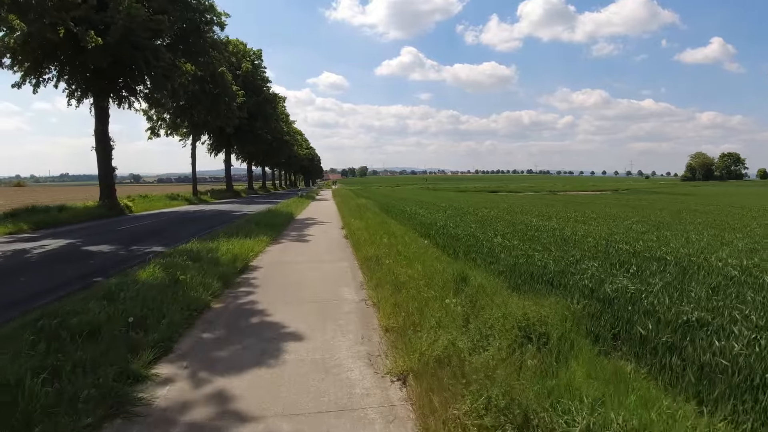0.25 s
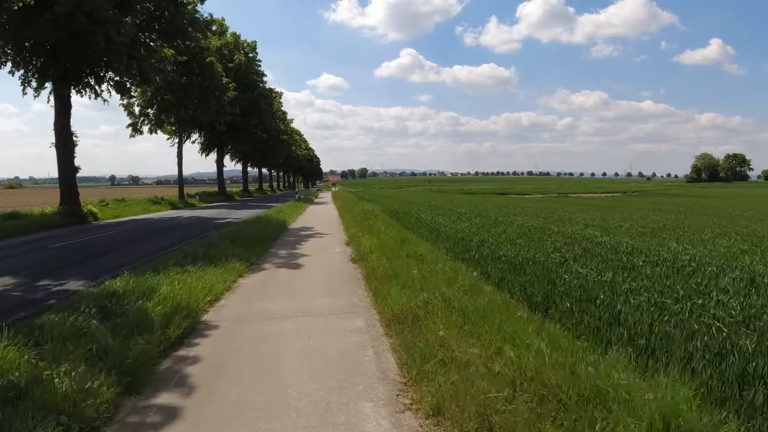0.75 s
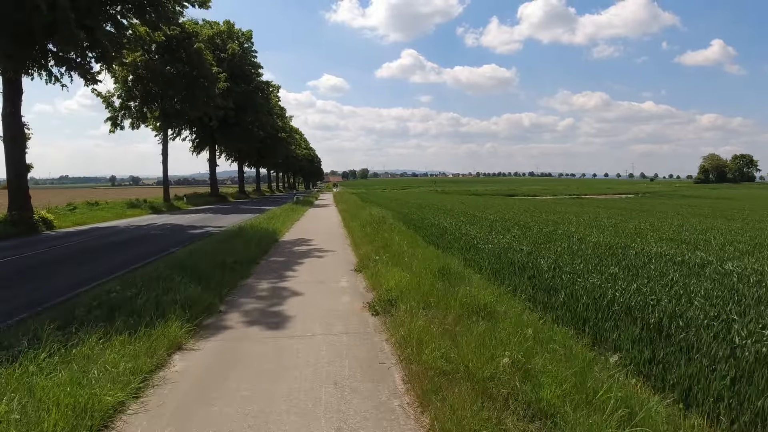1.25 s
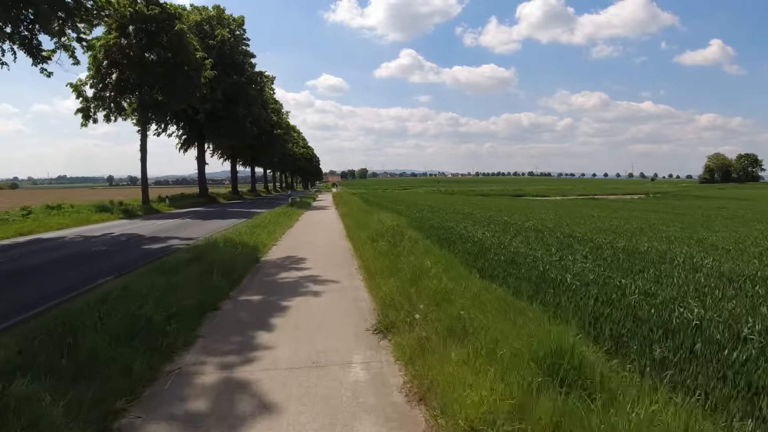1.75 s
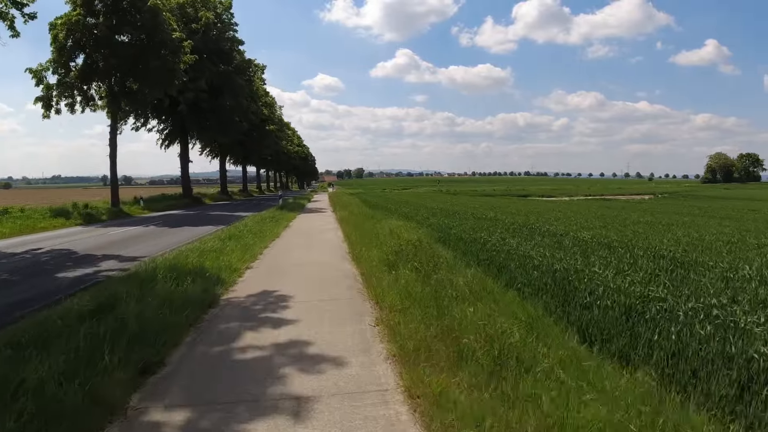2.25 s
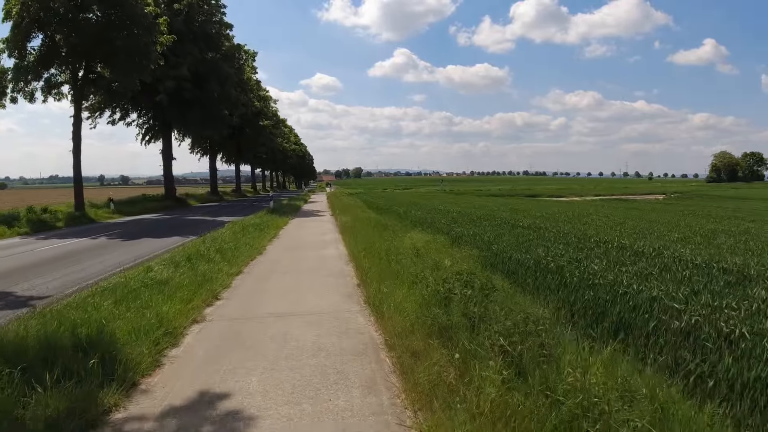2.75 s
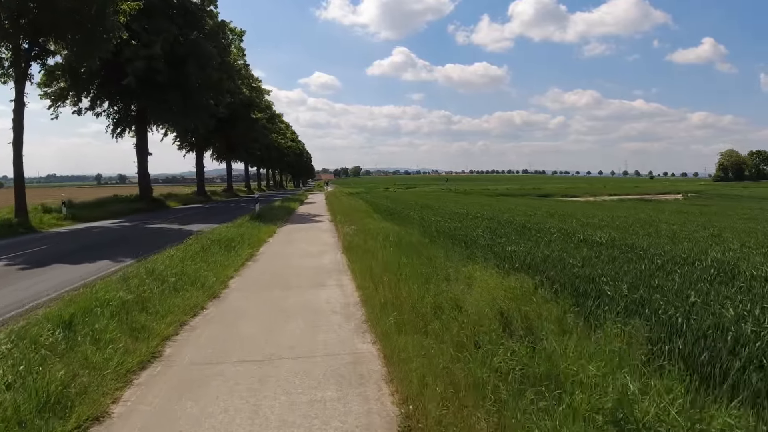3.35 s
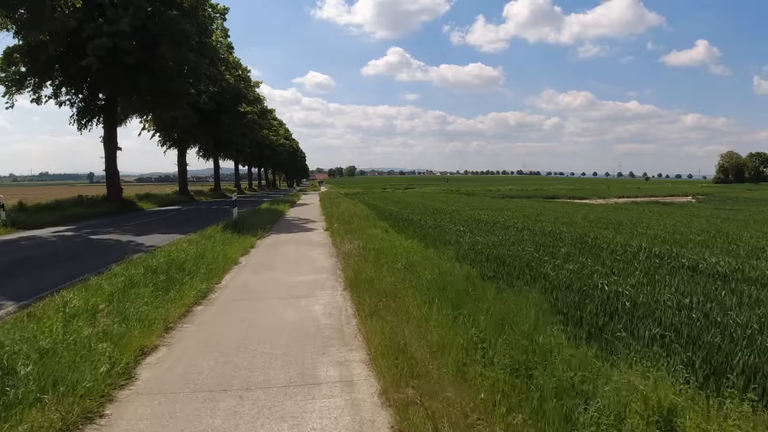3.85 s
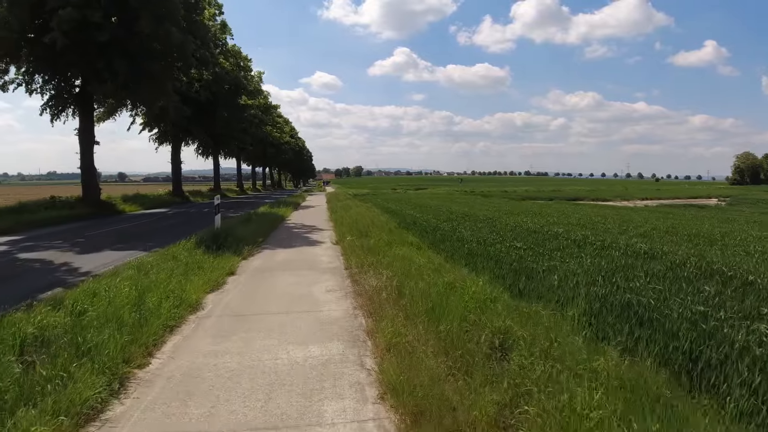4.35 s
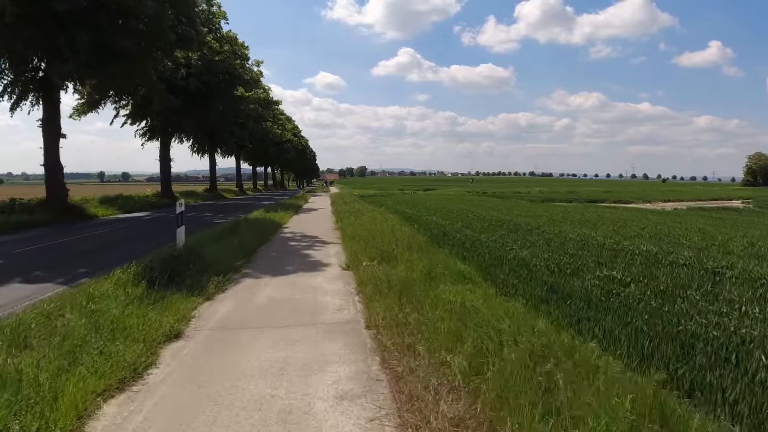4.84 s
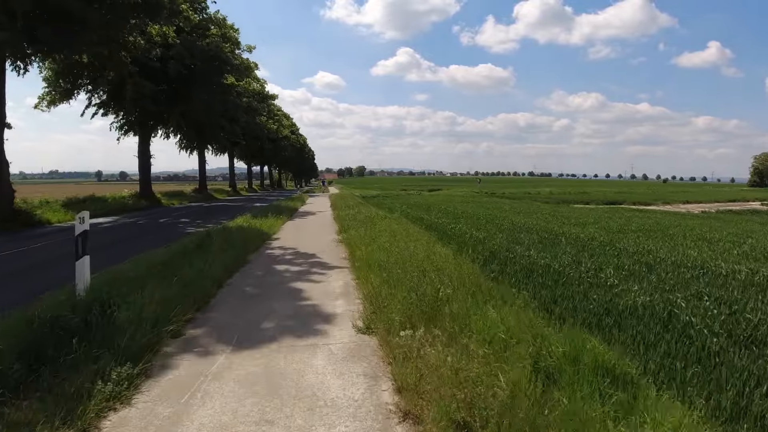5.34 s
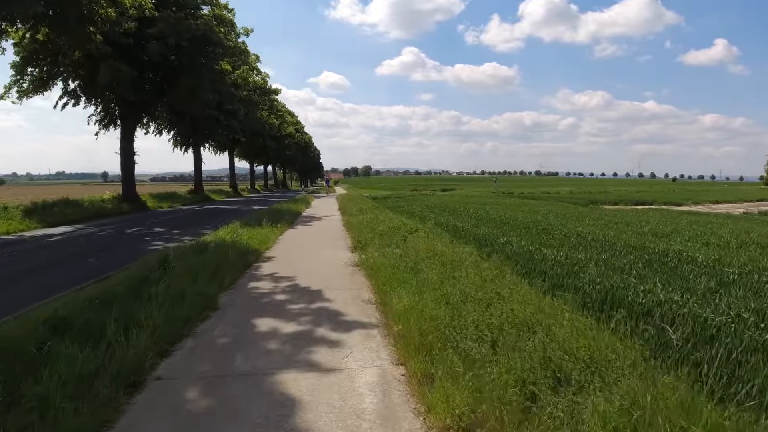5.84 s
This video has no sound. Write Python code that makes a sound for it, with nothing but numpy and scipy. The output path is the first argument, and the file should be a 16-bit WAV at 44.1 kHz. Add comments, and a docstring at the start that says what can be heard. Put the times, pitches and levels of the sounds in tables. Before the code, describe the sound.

An electric kick scooter rolls at constant speed along a concrete path beside open fields, heard from a microphone on board. Throughout, a low hub motor whine near 390 Hz beats and flutters over droning tyres, grainy grit, pebble ticks, a faint rough whirr and thin high hiss. Head wind rumbles low; a hard thump hits at about 0.8 s, then gusts crowd together from 1.0 to 2.5 s, swinging between left and right. Two hollow deck knocks sound at 2.3 and 2.5 s. The wind drops to a lull near 2.9 s, leaving motor and tyres clearer, with a brief gust around 3.3 s. Small loose-part clacks are scattered all along. Rolling turns coarser after 3.4 s; a bump booms at 4.8 s with rattling, and sharper clacks cluster from 5.1 to 5.9 s. Softer gusts arrive at 5.3 and 5.8 s, with a deep thump at 6.0 s as the ride continues.

```python
"""A whining hub motor with a flutter, over droning tyres: an electric kick scooter on a concrete path.
The whine is beating tones that follow the wheel speed; the rest of the ride is noise and clicks that
ring the frame: drone, grit, pebbles, and clacks of loose parts. Two hollow knocks ring on one note.
Gusts of head wind buffet two microphone ports: coloured noise that swells, with thumps that swing
through a few cycles. A faint high hiss lies on top."""
import sys
import numpy as np
from scipy import signal
from scipy.fft import rfft, irfft, next_fast_len
from scipy.io import wavfile

SR = 44100
rng = np.random.default_rng(int(sys.argv[2]) if len(sys.argv) > 2 else 0)


def output_pcm(signal):
    """Save a mono or channel-first signal as 16-bit PCM at the path in sys.argv[1].

    Samples are clipped to [-1, 1] before scaling.
    """
    pcm = np.clip(np.atleast_2d(signal).T, -1, 1) * 32767
    wavfile.write(sys.argv[1], SR, np.round(pcm).astype(np.int16))


N = 268613
TIME = np.arange(N) / SR
FFT_SIZE = next_fast_len(N + 8192)   # spare room lets filters ring out past the end
HZ = np.maximum(np.arange(FFT_SIZE // 2 + 1) * SR / FFT_SIZE, 1)


def from_db(db):
    """Turn decibels into a plain factor."""
    return 10 ** (np.asarray(db) / 20)


def rms_one(x):
    """Scale a signal to an average strength (RMS) of 1."""
    return x / np.sqrt(np.mean(x ** 2) + 1e-20)


def in_time(rows):
    """Read each column of a time table at every sample, with straight lines between rows."""
    s, *columns = np.transpose(rows)
    return [np.interp(TIME, s, c) for c in columns]


def at_hz(points):
    """Read a frequency table at every frequency, on a log axis."""
    knots, values = np.transpose(points)
    return np.interp(np.log(HZ), np.log(knots), values)


def by_frequency(x, response):
    """Filter x with a frequency response, scaled so that white noise keeps its power."""
    response = response / np.sqrt(np.mean(np.abs(response) ** 2))
    return irfft(rfft(x, FFT_SIZE) * response, FFT_SIZE)[..., :N]


def coloured(x, points):
    """Give white noise a colour."""
    return by_frequency(x, from_db(at_hz(points)))


def drift(rate_hz):
    """Slow chance with a spread of 1: smoothed noise, made at every 40th sample."""
    step, warm_up = 40, 2000
    r = np.exp(-2 * np.pi * rate_hz * step / SR)
    noise = rng.standard_normal(N // step + warm_up + 2)
    slow = signal.lfilter([1], [1, -2 * r, r * r], noise)[warm_up:]
    return np.interp(np.arange(N) / step, np.arange(len(slow)), rms_one(slow))


def kicks(starts, peaks_db):
    """A single click at each start."""
    out = np.zeros(N)
    out[np.round(starts * SR).astype(int)] = from_db(peaks_db)
    return out


def burst(starts, peaks_db, rise_s, decay_s):
    """An envelope that swells quickly at each start and dies away."""
    age = TIME[:SR // 5]
    shape = (1 - np.exp(-age / rise_s)) * np.exp(-age / decay_s)
    return signal.oaconvolve(kicks(starts, peaks_db), shape)[:N]


def resonances(modes):
    """Frequency response of modes driven side by side, each a peak with its own width."""
    return sum(from_db(db) / (1 + 1j * (HZ - hz * hz / HZ) / width) for hz, width, db in modes)


def shaken(body, envelope, colour, apart_db):
    """Dense tiny contacts (noise) drive the body; each port hears a small part of its own."""
    force = rng.standard_normal(N) + from_db(apart_db) * rng.standard_normal((2, N))
    return by_frequency(force * envelope, body * from_db(at_hz(colour)))


# wheel speed: time_s, speed (share of cruising speed)
WHEEL_SPEED = [(0, 1.0), (.2, 1.006), (.45, .998), (1.0, 1.003), (1.25, .989), (1.6, .999), (1.85, .99),
               (2.3, .987), (2.8, 1.0), (3.3, 1.007), (3.8, 1.006), (4.1, .996), (4.55, 1.009),
               (5.2, 1.012), (5.45, 1.002), (5.65, 1.013), (5.85, .995), (6.09, 1.01)]
# motor whine, before the trim and swell: time_s, level_db
WHINE_LEVEL = [(0, -46), (.55, -47.5), (1.0, -48.5), (1.45, -45), (2.2, -51.5), (2.5, -44), (3.6, -43.5),
               (4.2, -44.5), (4.5, -46.5), (5.05, -43), (5.23, -45.5), (5.32, -52), (5.42, -42), (5.8, -50),
               (5.96, -39), (6.09, -46.5)]
# tones at cruising speed: pitch_hz, relative_level_db, flutter (share of the tone), flutter_rate_hz
MOTOR_TONES = [(194.8, -16, 1, 13), (388.8, 4, 0.15, 17), (580.6, -8, 0.26, 4.8), (780, -22.5, 0.34, 5.7)]
BEAT_HZ = 4.79


def motor(wobble=0.0042, level_db=-2.0, beat_share=0.3, swell_db=1.2):
    """Tones follow the wheel, each beating with a weaker one below; the path shakes strength and phase."""
    speed, = in_time(WHEEL_SPEED)
    db, = in_time(WHINE_LEVEL)
    travel = np.cumsum(speed * (1 + wobble * drift(12))) / SR   # seconds' worth of cruising
    beat = 1 + beat_share * np.exp(-2j * np.pi * BEAT_HZ * TIME)
    out = 0
    for hz, tone_db, flutter, flutter_hz in MOTOR_TONES:
        shake = beat + flutter * (drift(flutter_hz) + 1j * drift(flutter_hz))
        out = out + from_db(tone_db) * np.real(shake * np.exp(2j * np.pi * hz * travel))
    return from_db(db + level_db + swell_db * drift(23)) * rms_one(out)


# wavering whirr of the running gear: centre_pitch_hz, level_db
WHIRR_TONES = [(1135, -59), (1660, -64.5)]


def whirr(waver=0.03, waver_hz=22, throb_db=4):
    """Rough tones whose pitch and strength wander many times a second."""
    out = 0
    for hz, db in WHIRR_TONES:
        phase = 2 * np.pi * np.cumsum(hz * (1 + waver * drift(waver_hz))) / SR
        throbbing = from_db(throb_db * drift(30)) * np.sin(phase)
        out = out + from_db(db) * rms_one(throbbing)
    return out


# tyre forces on concrete that grows coarser along the way: time_s, drone_db, grit_db (before trims)
ROLLING_LEVELS = [(0, -51.5, -53.5), (1.6, -50, -53), (2.9, -51, -53.5), (3.4, -47, -52), (4.5, -50, -51),
                  (5.4, -47, -50), (6.09, -51, -51)]
# bumps in the path that make the tyres boom: start_s, drive_db
TYRE_BUMPS = [(0.447, -47), (3.72, -47), (4.811, -36)]
# colour of the low tyre force: frequency_hz, level_db (per Hz)
DRONE_COLOUR = [(200, -4.5), (320, -8), (390, -3.5), (650, -5), (850, -28.5), (1400, -50)]
# colour of the force from the coarse grain: frequency_hz, level_db (per Hz)
GRIT_COLOUR = [(400, -11), (760, 2), (1200, 4), (2000, 1), (3500, -4), (3800, -5.5), (4250, -7.5),
               (5200, -17.5), (5700, -35), (8000, -47)]


def tyres(body, drone_db=-0.5, grit_db=0.2, lumpy_db=2.0, grain_db=1.05, rise_s=0.0099, decay_s=0.019):
    """The tyres drone on the concrete and boom at bumps; its coarse grain makes the frame chatter."""
    drone, grit = in_time(ROLLING_LEVELS)
    s, db = np.transpose(TYRE_BUMPS)
    drone_force = from_db(drone + drone_db + lumpy_db * drift(4.4))
    low_force = drone_force + burst(s, db, rise_s, decay_s)
    grit_force = from_db(grit + grit_db + grain_db * drift(110))
    low = shaken(body, low_force, DRONE_COLOUR, apart_db=-10.0)
    high = shaken(body, grit_force, GRIT_COLOUR, apart_db=-12.0)
    return low + high


def pebbles(body, per_s=60, level_db=13.0, spread_db=3.0):
    """Small stones tick under the tyres at random, a few of them harder."""
    _, grit = in_time(ROLLING_LEVELS)
    sizes = from_db(spread_db * np.minimum(rng.exponential(1, N), 2)) * rng.choice([-1, 1], N)
    hits = rng.random(N) < per_s / SR
    force = hits * sizes * from_db(grit + level_db)
    return by_frequency(force, body * from_db(at_hz(GRIT_COLOUR)))


# head wind that rises and falls, with its deepest lull near 2.9 s: time_s, level_db (before scaling)
WIND_LEVEL = [(0, -45), (0.27, -49), (0.58, -46), (0.88, -41), (1.25, -49), (1.58, -46), (2.0, -41.5),
              (2.47, -35), (2.68, -54.5), (2.9, -61), (3.1, -41), (3.2, -54.5), (3.42, -44.5),
              (3.63, -56.5), (3.87, -47.5), (5.6, -47), (6.09, -43.5)]
# gusts, each with a thump on the ports: start_s, swell_db, swell_width_s, thump_db, thump_pitch_hz
WIND_GUSTS = [(0.485, -43, 0.05, -33, 69.4), (0.71, -42.5, 0.029, -29.5, 151),
              (0.784, -36, 0.026, -12.5, 95), (0.857, -46, 0.017, -25, 97), (1.064, -38, 0.018, -21, 142),
              (1.315, -43, 0.022, -23.5, 138), (1.446, -40.5, 0.053, -18, 165),
              (1.477, -37.5, 0.021, -18.5, 151), (1.503, -48, .012, -20.5, 70),
              (1.701, -37.5, 0.014, -27, 106), (1.73, -44, .02, -25, 223), (1.836, -39.5, 0.019, -30, 75),
              (1.928, -41, 0.021, -22.5, 128), (2.016, -44, 0.016, -24.5, 152),
              (2.051, -40, 0.028, -31, 120), (2.118, -47, 0.018, -23.5, 113),
              (2.206, -36.5, 0.018, -20, 119), (2.277, -37, 0.027, -33, 104),
              (2.335, -39, 0.016, -18.5, 111), (2.37, -35.5, 0.022, -13, 124), (2.401, -41, .015, -26, 86),
              (2.456, -38, 0.054, -23, 120), (3.325, -38, 0.055, -24.5, 115),
              (4.518, -45.5, 0.054, -40, 60), (5.256, -43, 0.025, -26, 55.6),
              (5.772, -36, 0.072, -23.5, 88), (5.997, -39, 0.027, -16, 45.3)]
CREST_LAG_S = 0.014   # a gust is strongest this long after its thump starts
STRONG_WIND_DB = -33.5   # level of a full gust


def wind_strength():
    """Gusts swell and fade as bell curves on top of the varying wind; dB relative to a full gust."""
    wind_db, = in_time(WIND_LEVEL)
    power = from_db(wind_db) ** 2
    for s, swell_db, width_s, *_ in WIND_GUSTS:
        bell = np.exp(-((TIME - s - CREST_LAG_S) / width_s) ** 2)
        power = power + from_db(swell_db) ** 2 * bell
    return 10 * np.log10(power) - STRONG_WIND_DB


# colour of the low wind rumble: frequency_hz, level_db (per Hz)
BUFFET_COLOUR = [(8, -17.5), (25, 3.5), (65, 5), (145, -1.5), (195, -5), (240, -15), (330, -27),
                 (600, -37.5), (2000, -85)]
# colour of the higher flapping in strong gusts: frequency_hz, level_db (per Hz)
GUST_COLOUR = [(60, -19), (130, 7), (220, -3.5), (350, -8.5), (600, -23.5), (1500, -52), (4000, -82.5)]


def wind(rumble_db=-29.5, rumble_growth=0.98, lumpy_db=1.5, gust_db=-34, gust_growth=1.97):
    """Each port has eddies of its own; strong gusts add smaller, higher ones."""
    db = wind_strength()
    eddies = from_db(lumpy_db * np.array([drift(38), drift(17)]))
    rumble = from_db(rumble_db + rumble_growth * db) * coloured(rng.standard_normal((2, N)), BUFFET_COLOUR)
    flap = from_db(gust_db + gust_growth * db) * coloured(rng.standard_normal((2, N)), GUST_COLOUR)
    return eddies * (rumble + flap)


# colour of the high hiss: frequency_hz, level_db (per Hz)
HISS_COLOUR = [(2000, -13.5), (5500, 5.5), (7500, -4), (9500, 2.5), (11500, 1.5), (12600, 3), (14500, -1.5)]


def hiss(level_db=-30, flicker_db=1.0):
    """A faint high hiss, noise whose level follows the grit under the tyres."""
    _, grit = in_time(ROLLING_LEVELS)
    strength = from_db(grit + level_db + flicker_db * drift(30))   # level_db is relative to the grit
    return strength * coloured(rng.standard_normal((2, N)), HISS_COLOUR)


# clacks of loose parts: start_s, drive_db, dull_part_db (relative to drive_db),
# focus_hz (the fitting rings most around it)
LOOSE_CLACKS = [(0.059, -46, 15, 2600), (0.635, -47, 13, 2080), (0.728, -50, 16.5, 1900),
                (1.06, -52, 4, 2980), (1.2705, -48, -4, 2700), (1.531, -43, 7, 3000),
                (1.5465, -43.5, 10.5, 3500), (1.712, -44, -3, 2300), (1.736, -44.5, -10, 3430),
                (2.273, -42, -6, 3100), (2.95, -42.5, -0.5, 2650), (3.3305, -46, 8, 1890),
                (3.346, -42, 9.5, 1900), (3.9805, -40, -0.5, 2100), (4.278, -42, -1, 2900),
                (4.4325, -43, 9.5, 3520), (4.684, -46, 3, 3380), (4.802, -38, 4, 2540),
                (4.8079, -41.5, 8.5, 3100), (4.818, -51, 10.5, 2480), (4.849, -44, 3, 2660),
                (5.076, -44.5, 2, 3400), (5.093, -38, 8.5, 2050), (5.119, -36, 8, 2030),
                (5.1605, -44, 12, 1720), (5.297, -40, 10, 2080), (5.306, -43.5, 13.5, 1700),
                (5.481, -42, 9, 2920), (5.4894, -53.5, 19, 1750), (5.699, -39, 2, 1680),
                (5.717, -49.5, 4, 2930), (5.853, -42.5, 16.5, 3450), (5.865, -44, 10.5, 2520),
                (5.9073, -39, 13, 2500)]
# a loose metal fitting that rings along with each clack: pitch_hz, relative_level_db
FITTING_MODES = [(1730, 2), (2040, 1), (2480, -2), (2600, -2), (2920, -2), (3468, -1)]
FITTING_WIDTH_HZ = 50
# colour of the bright part of a clack: frequency_hz, level_db (per Hz)
BRIGHT_COLOUR = [(700, -24.5), (1500, -5), (2200, 4), (3500, 3.5), (3800, -5.5), (4300, -1.5), (5500, -23),
                 (8000, -39), (14000, -31.5)]
# colour of the dull part of a clack: frequency_hz, level_db (per Hz)
DULL_COLOUR = [(300, -11.5), (550, -6.5), (900, 2.5), (1800, -4.5), (2600, -16), (5000, -43)]


def clacks(body, rise_s=0.0051, decay_s=0.0098, bright_db=-5.5, ring_db=-4.0, dull_db=-5.5,
           chatter_db=0.5, focus_db_per_octave=22):
    """Loose parts slap the frame and chatter to rest; where they land decides which fitting modes ring."""
    s, db, dull_part_db, focus_hz = np.transpose(LOOSE_CLACKS)
    chatter = from_db(chatter_db * drift(240))
    bright = chatter * burst(s, db, rise_s, decay_s)
    dull = chatter * burst(s, db + dull_part_db, rise_s, decay_s)
    out = from_db(bright_db) * shaken(body, bright, BRIGHT_COLOUR, apart_db=-3.5)
    out = out + from_db(dull_db) * shaken(body, dull, DULL_COLOUR, apart_db=-15.0)
    for hz, mode_db in FITTING_MODES:
        octaves_away = np.abs(np.log2(hz / focus_hz))
        mode_peaks = db + ring_db + mode_db - focus_db_per_octave * octaves_away
        mode = resonances([(hz, FITTING_WIDTH_HZ, 0)])
        ringing = chatter * burst(s, mode_peaks, rise_s, decay_s)
        out = out + shaken(mode, ringing, BRIGHT_COLOUR, apart_db=-10.0)
    return out


def strikes(body, level_db=18.0, growth=.6, contact_s=.003):
    """The hardest contact of each clack is one sharp tick into the frame; it stands out in heavy clacks."""
    s, db, *_ = np.transpose(LOOSE_CLACKS)
    tick_db = db + level_db + growth * (db - db.max())
    return by_frequency(kicks(s + contact_s, tick_db), body * from_db(at_hz(BRIGHT_COLOUR)))


def thumps(level_db=0.0, spread=0.12, rise_s=0.0056, decay_s=0.011, port_lag_s=0.0011, steepness=0.45):
    """A big eddy sweeps over one port, then the other: pressure drops, then swings in uneven, steep cycles."""
    age = TIME[:SR // 12]
    unrest, swing = np.exp(spread * drift(47)), np.zeros(N)
    for s, _, _, db, hz in WIND_GUSTS:
        span = slice(int(s * SR), int(s * SR) + len(age))
        phase = 2 * np.pi * np.cumsum(hz * unrest[span]) / SR
        envelope = from_db(db + level_db) * (1 - np.exp(-age / rise_s)) * np.exp(-age / decay_s)
        swing[span] -= envelope[:len(phase)] * np.sin(phase + steepness * np.sin(phase))
    left = np.interp(TIME - port_lag_s, TIME, swing)   # the left port is swept later
    return np.array([left, swing])


# hollow knocks of the deck: start_s, drive_db
DECK_HITS = [(2.295, -30.5), (2.507, -33.5)]


def deck_knocks(hz=615, width_hz=45, level_db=0.0, contact_s=0.0015):
    """Two hollow knocks, at about 2.3 s and 2.5 s, ring briefly on one low note."""
    s, db = np.transpose(DECK_HITS)
    decay_s = 1 / (np.pi * width_hz)
    return burst(s, db + level_db, contact_s, decay_s) * np.sin(2 * np.pi * hz * TIME)


# resonances of wheels, deck and stem: pitch_hz, width_hz, relative_level_db
FRAME_MODES = [(416, 29, 2.5), (450, 44, -1.5), (503, 130, -7), (581.7, 46, -0.5), (640, 48, -7.5),
               (762, 50, -7), (838, 60, -12), (915, 55, -6.5), (1056, 76, -5), (1153, 83, -10.5),
               (1395, 100, -13), (1533, 140, -12), (1720, 100, -12.5), (2096, 270, -17), (2460, 95, -13),
               (2613, 88, -14.5), (2930, 76, -14.5), (3150, 160, -23.5), (3455, 85, -12.5),
               (4170, 370, -23), (4820, 270, -25)]
# how far the right port leads the left: frequency_hz, phase_radians
PORT_LEAD = [(400, 0.21), (1020, 0.17), (1320, 0.53), (1550, 0.43), (2600, 0.52), (2780, 1.9), (3000, 0.76),
             (3250, 1.94), (3400, 0.89), (3600, 3.08), (3900, 1.78), (4750, 3.95), (6500, 4)]


def scene():
    """The scooter reaches the right port a little before the left; the wind blows on both."""
    body = resonances(FRAME_MODES)
    rolling = motor() + whirr() + tyres(body) + pebbles(body)
    left, right = rolling + clacks(body) + strikes(body) + deck_knocks()
    left = by_frequency(left, np.exp(-1j * at_hz(PORT_LEAD)))
    return np.array([left, right]) + wind() + hiss() + thumps()


CUTOFF_HZ = 15700


def record(dry):
    """A steep low-pass filter cuts the top of the treble."""
    low_pass = signal.ellip(10, .1, 70, CUTOFF_HZ, fs=SR, output="sos")
    return signal.sosfilt(low_pass, dry)


dry = scene()
out = record(dry)
output_pcm(out)
```